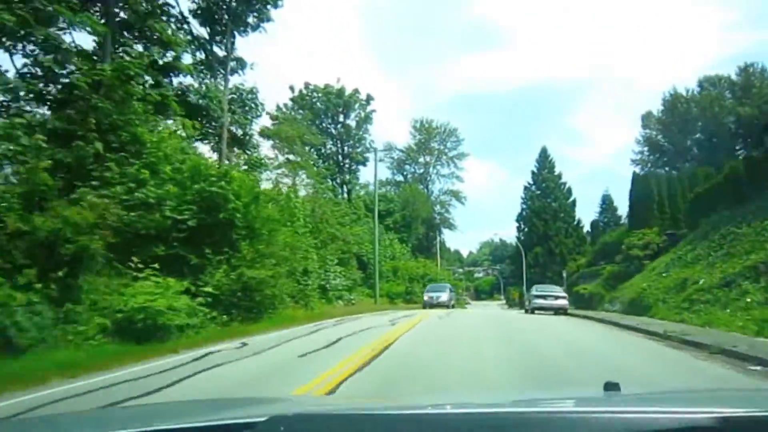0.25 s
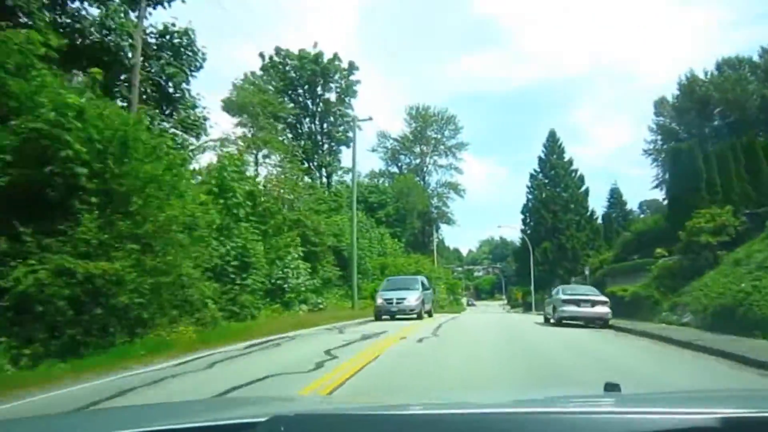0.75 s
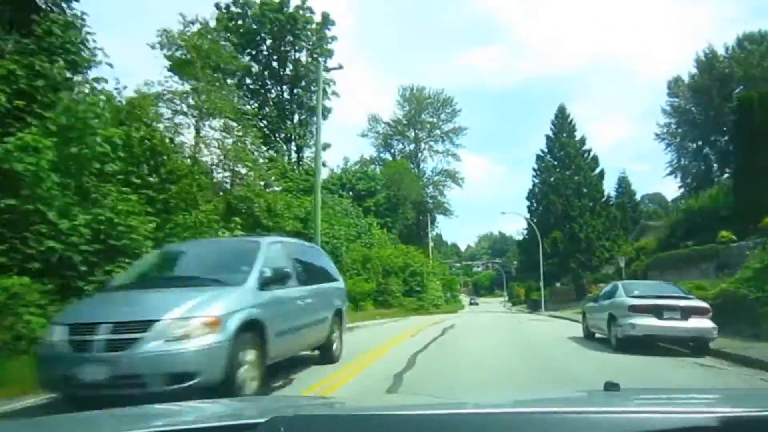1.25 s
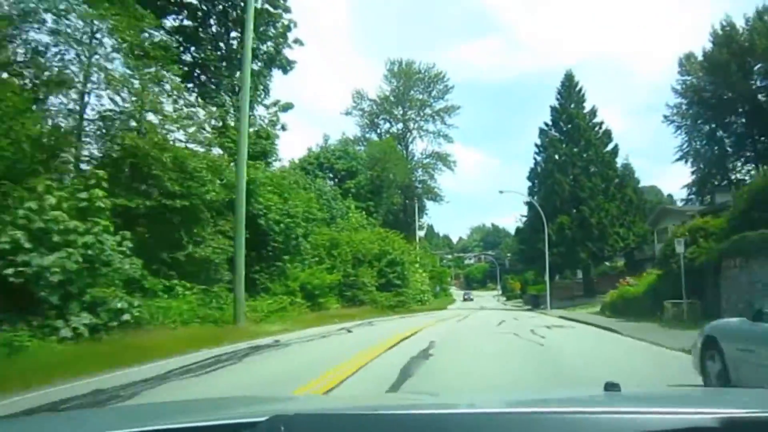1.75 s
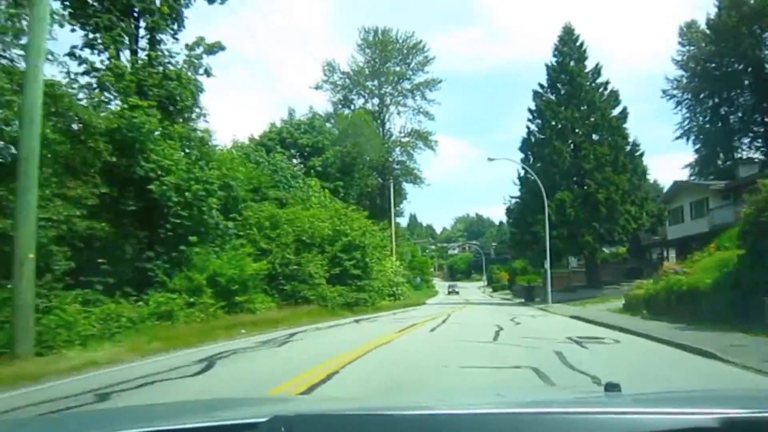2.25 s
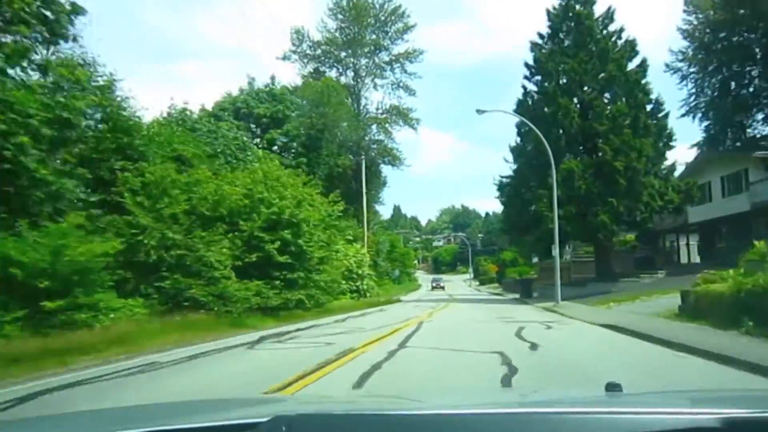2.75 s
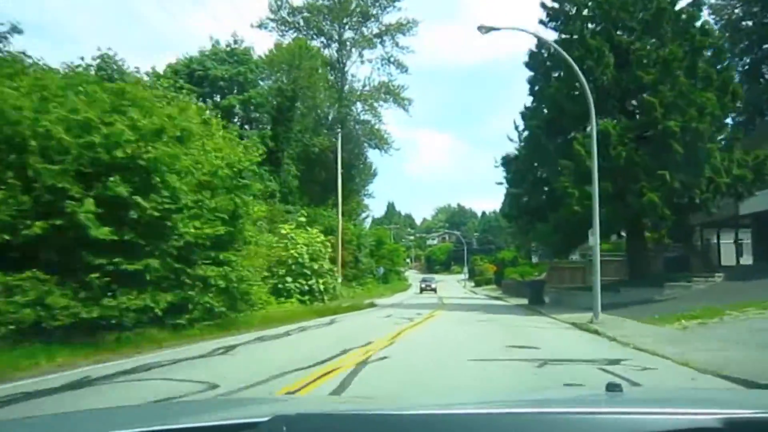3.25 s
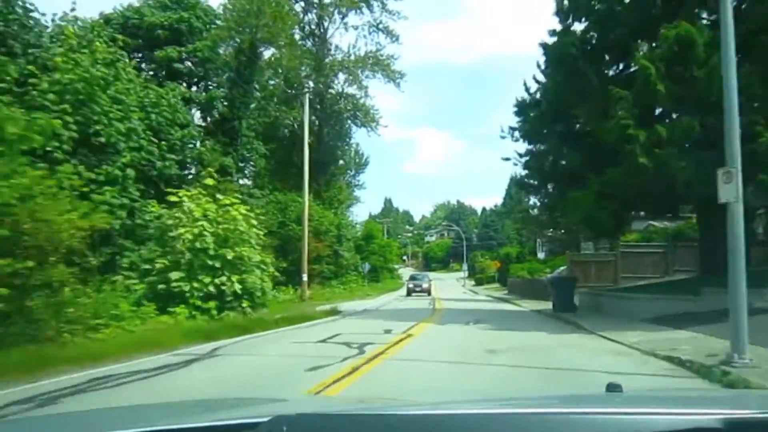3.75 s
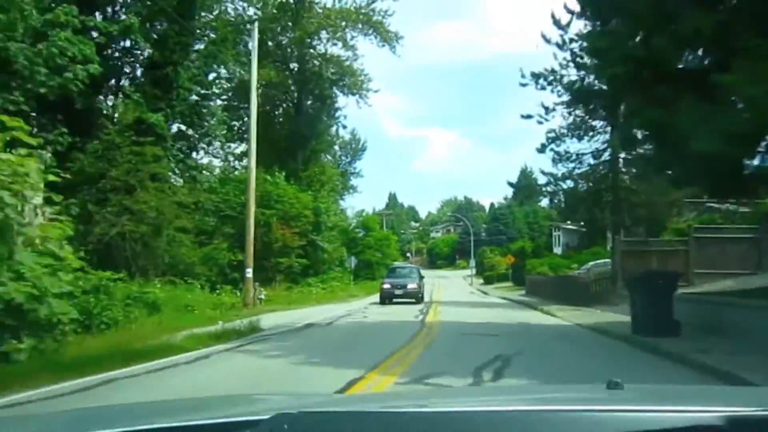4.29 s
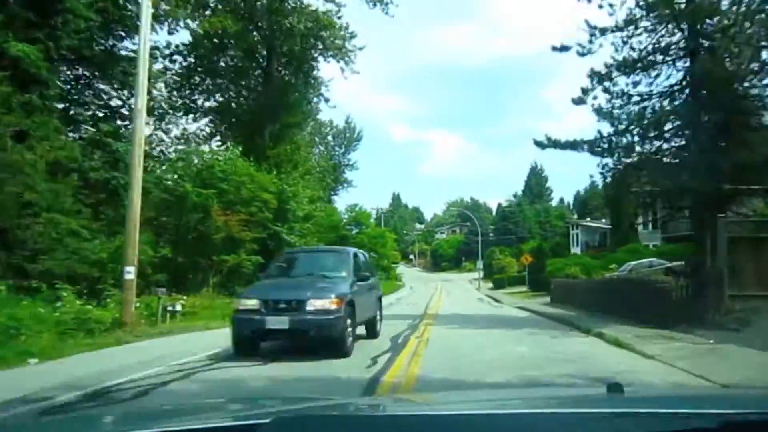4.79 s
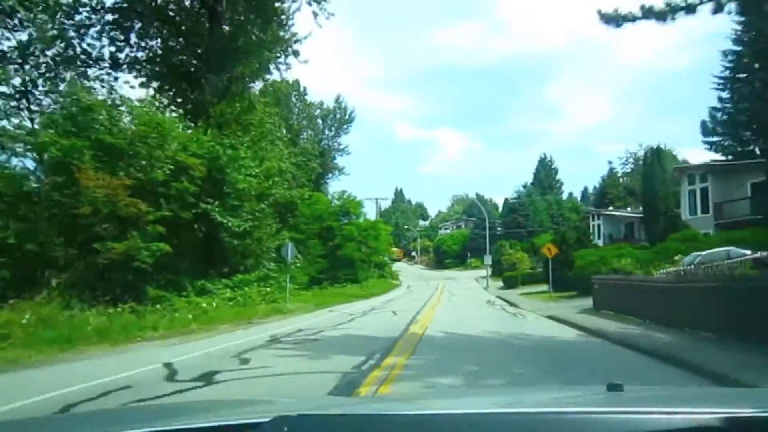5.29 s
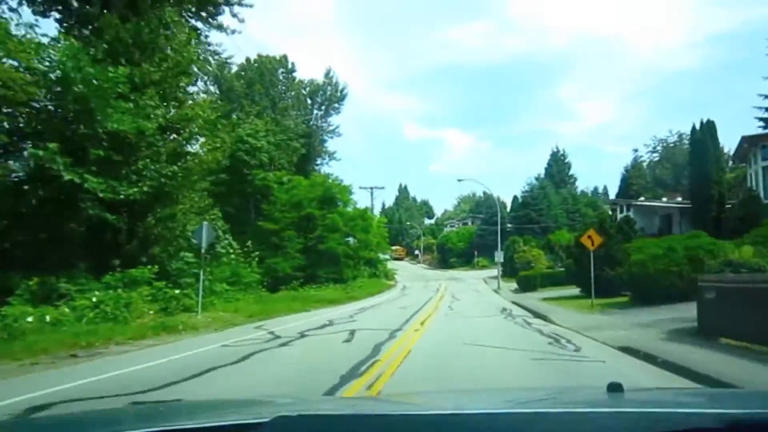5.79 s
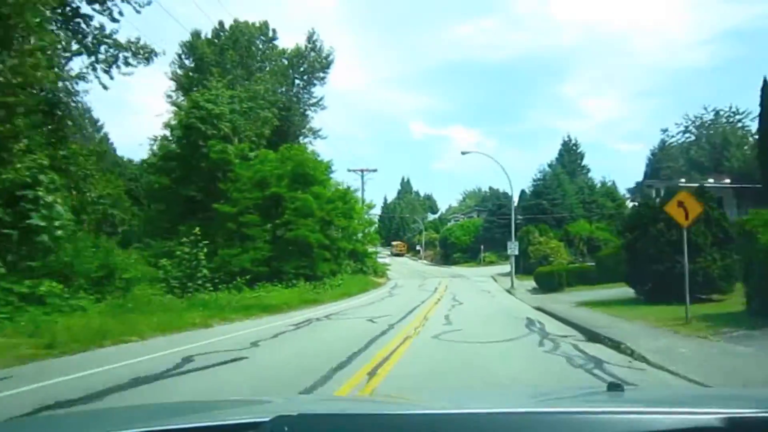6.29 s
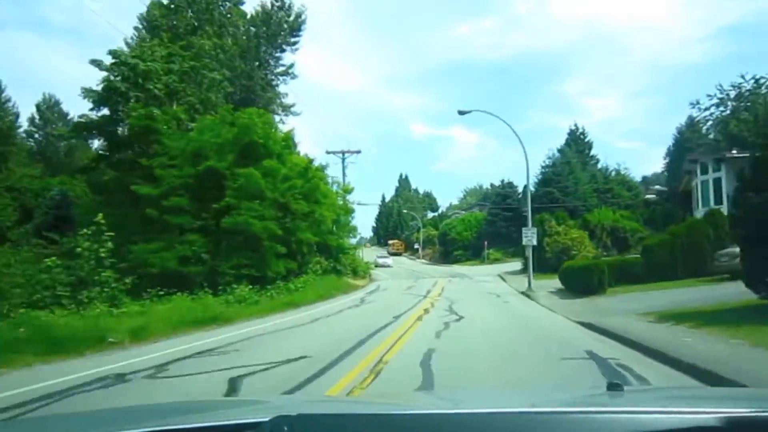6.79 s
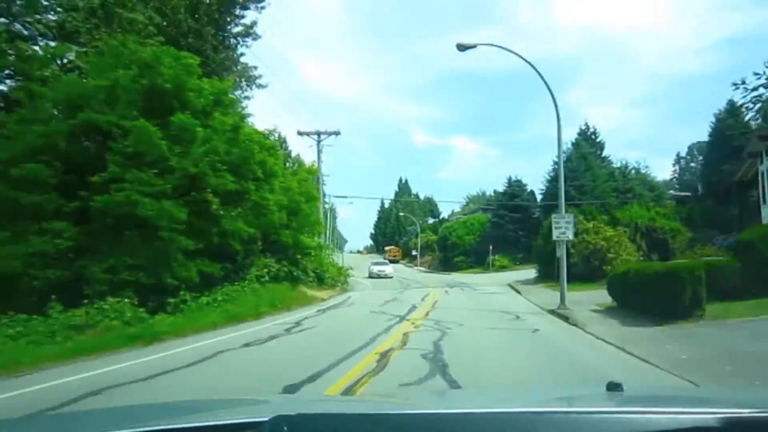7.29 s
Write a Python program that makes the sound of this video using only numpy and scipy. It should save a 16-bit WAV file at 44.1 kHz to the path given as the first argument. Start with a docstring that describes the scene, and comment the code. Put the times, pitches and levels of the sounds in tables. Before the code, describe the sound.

Heard from the dashboard of a moving car, tyres drum through the cabin over a low engine hum, a slight whine and light wind noise. After a couple of soft swishes from passing cars and a tiny tick, the wheels hit a bump: a loud thud, a softer one, and a quick clatter of plastic and small metal parts. The road noise dips slightly and recovers, another car slips by, and the rumble carries on.

```python
"""Inside a car cruising along a suburban road. From the start the body booms, the tyres drum through
the cabin, air hisses and the engine hums under a faint gear whine. From about 1.5 s other cars swish
past; near 3 s something ticks. Around 4 s front wheels, then rear wheels, cross a patch in the asphalt:
the body thumps and loose parts rattle, while a gain control ducks on the thumps and creeps back.
A thin hiss swells and stops, one more car passes, and the drive goes on."""
import sys
import numpy as np
from scipy import signal
from scipy.fft import rfft, irfft, next_fast_len
from scipy.io import wavfile
from scipy.ndimage import map_coordinates

SR = 44100
rng = np.random.default_rng(int(sys.argv[2]) if len(sys.argv) > 2 else 0)


def log_audio(samples):
    """Write samples as a 16-bit WAV file to the path given in sys.argv[1]."""
    # one column per channel
    frames = np.atleast_2d(samples).T
    # limit to full scale, then quantise
    limited = np.clip(frames, -1, 1)
    pcm = np.round(limited * 32767).astype(np.int16)
    wavfile.write(sys.argv[1], SR, pcm)


N = 332514
TIME = np.arange(N) / SR


def amp(db):
    """Decibels to gain."""
    return 10 ** (np.asarray(db) / 20)


def unit(x):
    """x at rms 1."""
    return x / np.sqrt(np.mean(x ** 2) + 1e-20)


def curves(rows):
    """One automation curve for each column after the time."""
    times, *columns = np.transpose(rows)
    return [np.interp(TIME, times, column) for column in columns]


def wobble(rate):
    """A smooth random curve, rate knots a second."""
    return map_coordinates(rng.standard_normal(int(N * rate / SR) + 4), [TIME * rate])


def filtered(x, response):
    """Equalise x with a gain that depends on frequency."""
    size = next_fast_len(N + SR // 2)
    return irfft(rfft(x, size) * response(np.fft.rfftfreq(size, 1 / SR)), size)[:N]


def add(track, s, sound):
    """Mix a sound into the track at s seconds."""
    start = round(s * SR)
    track[start:start + len(sound)] += sound[:N - start]


# resonances of cabin air, panels and tyre cavities: f/Hz, width/Hz, lift/dB
CABIN_MODES = [(19, 4.4, 0), (34.4, 10, 1), (60.3, 10, 6.5), (88.2, 17, 2.5), (102.5, 10, 8),
               (125, 7.1, 4.5), (148.4, 6.2, 2.5), (162.3, 17, 9.5), (213, 7, 6.5), (228.5, 7.7, 3.5),
               (282, 7.9, 2), (318, 9.4, 1.5), (355, 36, 2), (418, 26, 5.5), (768, 42, 3), (911, 55, 5.5),
               (994, 31, 3), (1122, 27, 2.5), (1280, 38, 6), (1386, 42, 4), (1470, 34, 4.5), (1684, 47, 5),
               (6000, 400, 1)]
def cabin_noise(spectrum):
    """Noise of rms 1 with a broad spectrum, lifted at the cabin's resonances."""
    freqs, levels = np.transpose(spectrum)

    def response(hz):
        broad = np.interp(np.log(hz + 1), np.log(freqs), levels)
        lift = sum(db / (1 + (2 * (hz - centre) / width) ** 2) for centre, width, db in CABIN_MODES)
        return amp(broad + lift)
    return unit(filtered(rng.standard_normal(N), response))


# road noise rises over the first second, then drifts gently:
# t/s, boom level/dB, rumble level/dB, tread level/dB
ROAD_LEVELS = [(0, -31, -24, -46.5), (0.6, -27.5, -22, -42), (1.3, -29, -20.5, -39.5),
               (2.1, -28.5, -20, -40), (3.2, -24, -22, -42.5), (3.8, -25, -22, -41.1),
               (5.1, -29.7, -21.4, -41.5), (5.9, -30.5, -20.5, -40.0), (7.54, -26, -20.5, -40)]
# tone of the swaying body: f/Hz, level/dB
BOOM_EQ = [(8, -26.5), (18, -1.5), (25, -2), (35, 5.5), (55, 1), (75, -18), (130, -50), (400, -100)]
def body_boom(waves_db=2.3):
    """Long waves in the road make the body boom."""
    boom_db, _, _ = curves(ROAD_LEVELS)
    return amp(boom_db + waves_db * wobble(2.6)) * cabin_noise(BOOM_EQ)


# tone of the low rumble and of the midrange tread roar: f/Hz, level/dB
RUMBLE_EQ = [(8, -47), (25, -27), (55, -8), (90, -1), (140, -7), (200, -10), (280, -6), (350, -13),
             (440, -19.5), (500, -21), (545, -33), (800, -51), (1500, -110)]
TREAD_EQ = [(300, -38), (530, -4), (620, 1), (700, -3.5), (790, -1), (1000, -2.5), (1160, -11), (1400, -11),
            (1750, -17), (2100, -24), (3000, -37), (8000, -65)]
def tyres(grain_db=.65, flutter_db=.5):
    """Uneven asphalt shakes the body through the tyres and makes the tread roar."""
    _, rumble_db, tread_db = curves(ROAD_LEVELS)
    surface_db = grain_db * wobble(9)
    rumble = amp(rumble_db + .61 + surface_db) * cabin_noise(RUMBLE_EQ)
    tread = amp(tread_db + .5 + .5 * surface_db + flutter_db * wobble(22)) * cabin_noise(TREAD_EQ)
    return rumble + tread


# tone of the airflow: f/Hz, level/dB
AIR_EQ = [(600, -22.5), (1500, 0), (2400, 1.5), (3200, -4), (4500, -8), (6500, -10.5), (10000, -14.5),
          (15500, -19.5)]
def air_rush(level_db=-59.5, follow=.61, cruise_tread_db=-41):
    """Air rushes over the glass; its level partly follows the tread roar."""
    _, _, tread_db = curves(ROAD_LEVELS)
    return amp(level_db + follow * (tread_db - cruise_tread_db) + .27 * wobble(12)) * cabin_noise(AIR_EQ)


# gear mesh pitch as the car gathers a little speed: t/s, f/Hz
GEAR_MESH = [(0, 488.6), (2.3, 491), (3.7, 499.8), (5.7, 518.7), (7.54, 515.5)]
# partials of the engine hum: multiple of the crank rate, level/dB
ENGINE_ORDERS = [(2, -33.5), (4, -50.5), (7, -42.5)]
def drivetrain(mesh_per_turn=15.8, waver_db=1.5, drift_hz=1.0, loudest_hz=493.3, fade_db_per_hz=.62):
    """Engine hum and gear whine follow one shaft; the whine fades away from its loudest pitch."""
    mesh_hz, = curves(GEAR_MESH)
    mesh_phase = 2 * np.pi * np.cumsum(mesh_hz + drift_hz * wobble(12)) / SR
    crank_phase = mesh_phase / mesh_per_turn
    whine_db = -43.5 - fade_db_per_hz * np.abs(mesh_hz - loudest_hz)
    whine = amp(whine_db + waver_db * wobble(11)) * np.sin(mesh_phase)
    hum = sum(amp(db + waver_db * wobble(4.6)) * np.sin(order * crank_phase + .5 * wobble(6))
              for order, db in ENGINE_ORDERS)
    return np.sqrt(2) * (whine + hum)


# cars, oncoming or parked, pass the side windows: t/s, level/dB, half length/s
PASS_BYS = [(1.502, -56.5, 0.39), (2.026, -60.5, .06), (5.16, -60, 0.099)]
# tone of their swish: f/Hz, level/dB
SWISH_EQ = [(700, -19.5), (1900, 7), (2700, -5), (3800, -7), (7000, -15), (15000, -31)]
def traffic():
    """Each car is loudest as it draws level and falls away with distance."""
    swells = sum(amp(db) / (1 + ((TIME - s) / half) ** 2) for s, db, half in PASS_BYS)
    return swells * cabin_noise(SWISH_EQ)


def rattle(contacts, modes, scuff_db, scuff_t60, scuff_hz, attack_s=.00058, detune=.021):
    """Each contact rings a part's modes a little differently, with a short scuff of noise."""
    out, t = np.zeros(N), np.arange(SR // 8) / SR
    lowpass = signal.butter(2, scuff_hz, fs=SR)
    for s, db in contacts:
        ring = np.zeros(len(t))
        for hz, level, t60 in modes:
            decay = amp(level + rng.normal(0, 1.2) - 60 * t / t60)
            ring += decay * np.sin(2 * np.pi * (hz * rng.normal(1, detune) * t + rng.random()))
        noise = unit(signal.lfilter(*lowpass, rng.standard_normal(len(t))))
        scuff = amp(scuff_db - 60 * t / scuff_t60) * noise
        add(out, s, .5 * amp(db) * (ring + scuff) * (1 - np.exp(-t / attack_s)))
    return out


# cues of a tiny double tick: t/s, level/dB
TICK_HITS = [(2.9207, -42), (2.927, -46)]
# its ring: f/Hz, level/dB, t60/s
TICK_MODES = [(7500, -3, .008), (9000, -4, .008), (11000, -1, .008), (12800, -2, .008), (14200, 3, .008)]
def tiny_tick():
    """A loose part touches twice, with a very short, bright ring."""
    return rattle(TICK_HITS, TICK_MODES, scuff_db=-2.5, scuff_t60=.015, scuff_hz=15800)


# bursts of dashboard chatter: t/s, level/dB, length/s
TRIM_BURSTS = [(3.88, -43.5, .01), (4.004, -25, .07), (4.175, -38.5, .01), (4.272, -38, .01)]
# ring of the trim: f/Hz, level/dB, t60/s
TRIM_MODES = [(940, 6, 0.068), (1450, -0.5, 0.05), (1820, 4.5, 0.024), (2290, -5, 0.061), (2880, -3, 0.022),
              (3160, -6, 0.028), (4130, -16, 0.011), (6170, -20, .012), (7630, -14, 0.021)]
def trim_chatter(gap_s=.0122, fade_db_per_s=27):
    """The dashboard trim bounces, once or in a quick run of fading contacts."""
    bounces = [(s + age, db - fade_db_per_s * age)
               for s, db, length in TRIM_BURSTS for age in np.arange(0, length, gap_s)]
    return rattle(bounces, TRIM_MODES, scuff_db=-7, scuff_t60=.038, scuff_hz=5000, detune=.035)


# front axle, then the softer, deeper, slower rear axle: delay/s, level/dB, pitch factor
AXLES = [(0, 0, 1), (.21, -9.5, .5)]
# blows of the patch on the front wheels: t/s, level/dB, f/Hz, swell time/s
PATCH_BLOWS = [(3.9529, -4, 181, 0.0062), (3.9679, -3, 110, .004), (3.998, 4, 123.5, .004),
               (4.046, -4, 108, 0.0029)]
def wheel_thumps(slap_db=-22, slap_hz=650):
    """Each axle strikes the patch; a blow swells and dies in a few cycles, with a dull rubber slap."""
    out, t = np.zeros(N), np.arange(SR // 5) / SR
    lowpass = signal.butter(4, slap_hz, fs=SR)
    for delay, axle_db, pitch in AXLES:
        for s, db, hz, swell in PATCH_BLOWS:
            age = pitch * t / swell
            envelope = (age * np.exp(1 - age)) ** 2
            slap = amp(slap_db) * unit(signal.lfilter(*lowpass, rng.standard_normal(len(t))))
            body = -np.sin(2 * np.pi * hz * pitch * t)
            add(out, s + delay, amp(db + axle_db) * envelope * (body + slap))
    return out


# click cues at the crests of the hardest thumps: t/s, level/dB
CREST_CLICKS = [(3.9714, -25.5), (4.002, -25)]
def overload_clicks(width_s=.00022):
    """Sharp overload clicks, under a millisecond long, repeated more softly with the rear thumps."""
    out, t = np.zeros(N), np.arange(-SR // 500, SR // 500) / SR
    envelope = np.exp(-.5 * (t / width_s) ** 2)
    for delay, axle_db, _ in AXLES:
        for s, db in CREST_CLICKS:
            noise = unit(signal.lfilter([1], [1, -.3], rng.standard_normal(len(t))))
            add(out, s + delay + t[0], .5 * amp(db + axle_db) * envelope * noise)
    return out


# clink cues: t/s, level/dB
METAL_HITS = [(4.016, -41.5), (4.029, -43), (4.062, -35), (4.108, -42), (4.15, -48), (4.226, -49),
              (4.3289, -50)]
# ring of the metal: f/Hz, level/dB, t60/s
METAL_MODES = [(7600, -19, 0.027), (10500, 2, 0.032), (10600, -18, .025), (12900, -16, .012)]
def metal_clinks():
    """The jolt shakes a small metal piece, which rings high and thin."""
    return rattle(METAL_HITS, METAL_MODES, scuff_db=1, scuff_t60=.04, scuff_hz=11500, detune=.005)


# tap cues: t/s, level/dB
PLASTIC_HITS = [(4.053, -25), (4.095, -28), (4.115, -21.5), (4.1355, -22.5), (4.294, -27.5)]
# ring of the plastic: f/Hz, level/dB, t60/s
PLASTIC_MODES = [(1600, 7, 0.0064), (2340, -1, 0.022), (2590, 0, 0.017), (3330, -0.5, 0.019),
                 (3750, -3, 0.0097), (4220, 3.5, 0.013), (5190, -11, 0.016), (7600, -28, .01),
                 (9190, -22, 0.011), (11400, -11, .006)]
def plastic_taps():
    """A loose plastic part taps, its ring quickly damped."""
    return rattle(PLASTIC_HITS, PLASTIC_MODES, scuff_db=-7, scuff_t60=.013, scuff_hz=6500,
                  attack_s=.001, detune=.012)


# knock cues: t/s, level/dB
PANEL_HITS = [(4.2015, -24.5), (4.207, -27.5)]
# ring of the panel: f/Hz, level/dB, t60/s
PANEL_MODES = [(980, 2, 0.039), (1240, 7, 0.026), (1780, 0, 0.016), (2260, -1.5, 0.026), (2750, -10, 0.016),
               (3870, -26, 0.023)]
def panel_knocks():
    """A jolted hollow panel knocks twice in the midrange."""
    return rattle(PANEL_HITS, PANEL_MODES, scuff_db=-10, scuff_t60=.044, scuff_hz=2600)


# tone of the thin hiss: f/Hz, level/dB
HISS_EQ = [(3000, -29), (8000, -1.5), (11000, -1.5), (15500, -2)]
def thin_hiss(peak_s=4.775, peak_db=-61, rise_db_per_s=55, fall_db_per_s=350):
    """A thin hiss grows slowly and stops quickly."""
    t = TIME - peak_s
    return amp(peak_db + np.minimum(rise_db_per_s * t, -fall_db_per_s * t)) * cabin_noise(HISS_EQ)


def scene():
    """The cabin as heard from the dashboard, in mono."""
    bed = body_boom() + tyres() + air_rush() + drivetrain()
    passing_cars_and_tick = traffic() + tiny_tick()
    jolt = trim_chatter() + wheel_thumps() + overload_clicks()
    loose_parts = metal_clinks() + plastic_taps() + panel_knocks()
    return (bed + passing_cars_and_tick + jolt + loose_parts + thin_hiss())[None]


def record(dry, threshold_db=-6, attack_s=.0025, release_db_per_s=10, ceiling=.72, top_hz=15830):
    """Gain control ducks fast on peaks and recovers slowly; a soft clip and a treble cut follow."""
    x = dry[0]
    excess_db = np.maximum(20 * np.log10(np.abs(x) + 1e-9) - threshold_db, 0)
    # each peak holds the gain down until the steady recovery has made it up
    recovery_db = release_db_per_s * TIME
    duck_db = np.maximum.accumulate(excess_db + recovery_db) - recovery_db
    pole = np.exp(-1 / (attack_s * SR))
    ducked = x * amp(-signal.lfilter([1 - pole], [1, -pole], duck_db))
    clipped = ducked / (1 + (ducked / ceiling) ** 10) ** (1 / 10)
    return filtered(clipped, lambda hz: hz < top_hz)[None]


dry = scene()
out = record(dry)
log_audio(out)
```